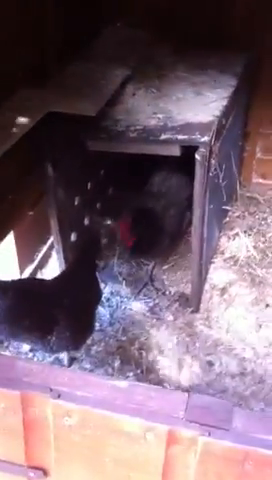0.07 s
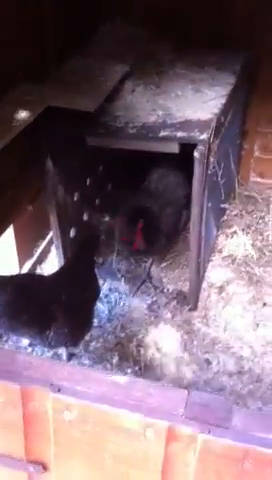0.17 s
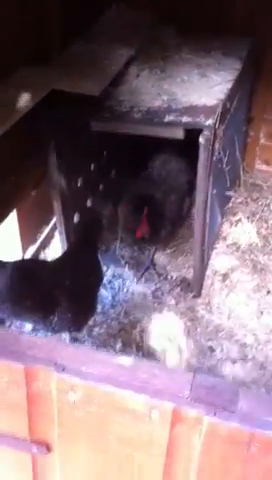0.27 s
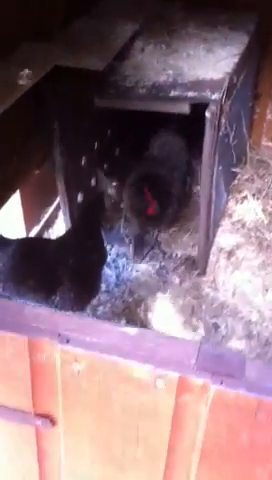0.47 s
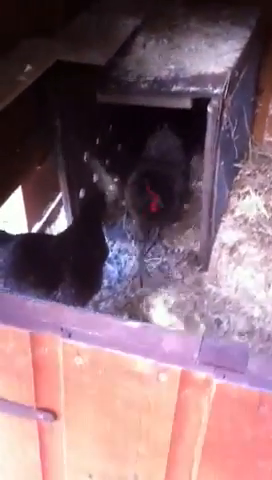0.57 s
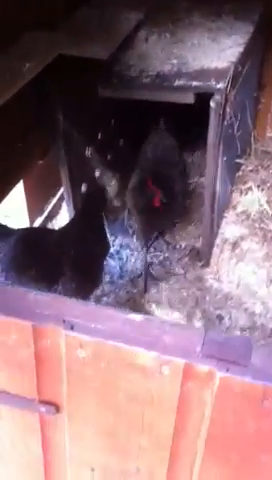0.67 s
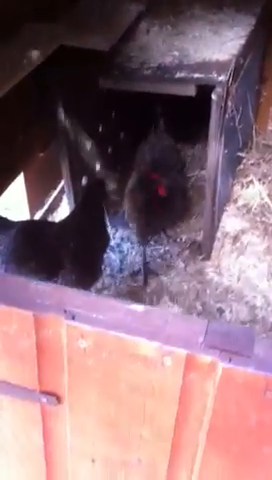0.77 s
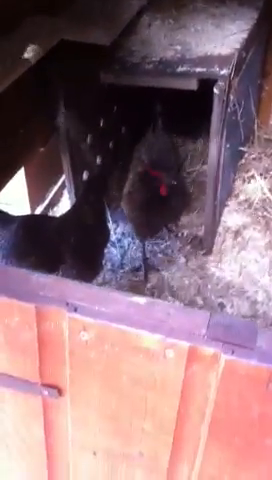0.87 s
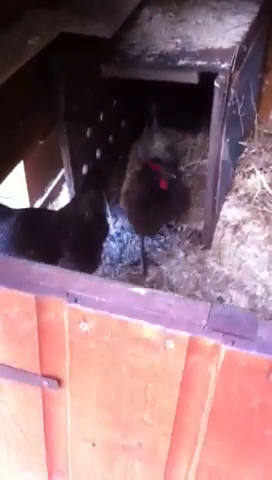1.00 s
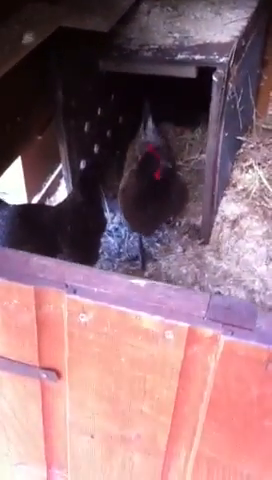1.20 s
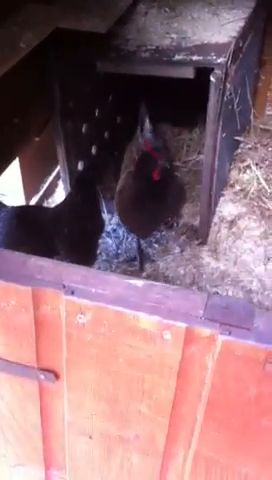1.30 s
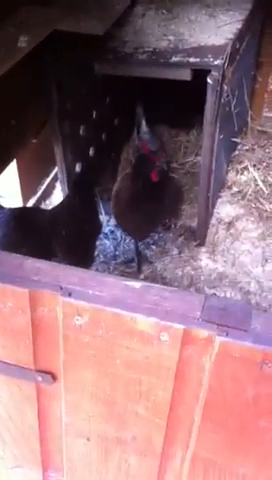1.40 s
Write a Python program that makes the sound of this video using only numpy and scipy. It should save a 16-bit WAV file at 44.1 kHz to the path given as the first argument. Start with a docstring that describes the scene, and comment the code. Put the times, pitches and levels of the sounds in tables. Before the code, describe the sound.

Hens clucking close to the microphone in a small wooden coop: a soft grunt, four short clucks growing hoarser, a loud broken squawk, then a higher cluck, with faint straw rustles over quiet outdoor air.

```python
"""A quiet outdoor background, then hens in a small wooden coop, close to the microphone: a low grunt,
four clucks at an even pace, the first fairly clean and the other three hoarse, one loud squawk that
breaks between clean and split tones, a higher cluck. Feet rustle in the straw. Pulses through throat
resonances make the clucks, drifting tones and hoarse air the squawk, a falling tone the grunt, and
filtered noise the straw and the air. Decaying noise echoes give the short ring of the boards."""
import sys
import numpy as np
from scipy import signal
from scipy.fft import rfft, irfft
from scipy.io import wavfile

SR = 44100
rng = np.random.default_rng(int(sys.argv[2]) if len(sys.argv) > 2 else 0)


def output_pcm(signal):
    """Save a mono or channel-first signal as 16-bit PCM at the path in sys.argv[1].

    Samples are clipped to [-1, 1] before scaling.
    """
    pcm = np.clip(np.atleast_2d(signal).T, -1, 1) * 32767
    wavfile.write(sys.argv[1], SR, np.round(pcm).astype(np.int16))


N = 63945
T = np.arange(N) / SR
ONSET_S = 0.0025  # ramp at the start of every cluck and at both ends of a level table


def amp(db):
    """Decibels to gain."""
    return 10 ** (np.asarray(db) / 20)


def unit(x):
    """Scale to rms 1 over the whole length."""
    return x / np.sqrt(np.mean(x ** 2))


def curve(table, axis):
    """One column of a table, joined by straight lines in time."""
    rows = np.array(table)
    return np.interp(T, rows[:, 0], rows[:, axis])


def loudness(table, axis):
    """Gain from a dB column, silent outside the table."""
    inside = np.minimum(T - table[0][0], table[-1][0] - T)
    return amp(curve(table, axis)) * np.clip(inside / ONSET_S, 0, 1)


def low_pass(x, order, hz):
    """Butterworth filter that keeps what lies below hz."""
    return signal.sosfilt(signal.butter(order, hz, fs=SR, output="sos"), x)


def high_pass(x, order, hz):
    """Butterworth filter that keeps what lies above hz."""
    return signal.sosfilt(signal.butter(order, hz, "high", fs=SR, output="sos"), x)


def wobble(hz):
    """Smooth chance with spread 1, about hz wide."""
    return unit(low_pass(rng.standard_normal(N), 3, hz))


def resonate(x, hz, width_hz):
    """One resonance, gain 1 at its centre."""
    return signal.lfilter(*signal.iirpeak(hz, hz / width_hz, fs=SR), x)


def formant(x, hz, width_hz):
    """A throat resonance with steep skirts, rms 1."""
    return unit(resonate(resonate(x, hz, width_hz), hz, width_hz))


def colour(x, points):
    """Causal minimum-phase filter through (Hz, dB) points, by folding the cepstrum."""
    hz, db = np.array(points).T
    size = 2048
    log_axis = np.log(np.fft.rfftfreq(size, 1 / SR) + 1)
    gain = amp(np.interp(log_axis, np.log(hz), db))
    cepstrum = irfft(np.log(gain))
    cepstrum[1:size // 2] *= 2
    cepstrum[size // 2 + 1:] = 0
    return signal.fftconvolve(x, irfft(np.exp(rfft(cepstrum))))[:N]


def cycles(hz, jitter, rate_hz):
    """Running cycle count of an unsteady membrane; jitter is the spread as a share of the pitch."""
    return np.cumsum(hz * (1 + jitter * wobble(rate_hz))) / SR


def tone(phase):
    """Sine of rms 1."""
    return np.sqrt(2) * np.sin(2 * np.pi * phase)


def pulses(phase):
    """One click per cycle, shared between two samples."""
    step = np.maximum(np.gradient(phase), 1 / SR)
    ramp = np.floor(phase) + np.clip(phase % 1 / step, 0, 1)
    return unit(np.diff(ramp, prepend=ramp[0]))


def puffs(phase):
    """Air that hisses hardest at the start of each cycle."""
    decay_cycles = 0.73
    return unit(rng.standard_normal(N) * np.exp(-(phase % 1) / decay_cycles))


def smear(x):
    """The nearest boards blur each pulse over a few milliseconds and ripple its spectrum."""
    decay_s, echo_db = 0.0054, 0.5
    echo = rng.standard_normal(N) * np.exp(-T / decay_s)
    return unit(x + amp(echo_db) * signal.fftconvolve(x, echo / np.linalg.norm(echo))[:N])


def open_beak(x, treble_db):
    """The gape of the beak raises or lowers the treble."""
    treble_hz = 4020
    low = signal.sosfiltfilt(signal.butter(2, treble_hz, fs=SR, output="sos"), x)
    return low + amp(treble_db) * (x - low)


def outdoor_air():
    """Steady noise, weighted to the lows, from outside the coop."""
    # spectrum of the background, relative: f/Hz, level/dB
    air_spectrum = [(25, -31), (110, -9.5), (170, -3), (270, -0.5), (400, -12), (800, -8), (1500, -16.5),
                    (4000, -23.5), (15500, -35)]
    air_db = -52.5
    return amp(air_db) * unit(colour(rng.standard_normal(N), air_spectrum))


def grunt():
    """A soft falling note from a closed beak: a tone and its octave, just before the first cluck."""
    # grunt: t/s, f/Hz, level of the fundamental/dB
    grunt_path = [(0.115, 184, -64), (0.145, 177.3, -45.5), (0.168, 161.3, -38.5), (0.200, 155, -63),
                  (0.235, 133, -54)]
    octave_db = -4  # against the fundamental
    phase = cycles(curve(grunt_path, axis=1), jitter=0.0084, rate_hz=43)
    return loudness(grunt_path, axis=2) * (tone(phase) + amp(octave_db) * tone(2 * phase))


def cluck(start, db, swell_db, hz, rough, low_hz, high_hz, high_db, treble_db, hold, fall_db_per_s):
    """Uneven pulses ring the throat and slow to a creak; the beak opens briefly and lets the rasp out."""
    # spectrum of the rasp, relative: f/Hz, level/dB
    rasp_spectrum = [(250, -9.5), (520, 5), (1300, 9.5), (1550, -8), (1780, 10), (1950, 2), (2150, 9.5),
                     (2450, 3.5), (2700, 1.5), (3800, 0), (4400, -12.5), (5900, -5.5), (6900, -11.5),
                     (8000, -11), (11300, -18), (15500, -21)]
    attack_s, creak_s, creak_drop = .027, .09, .6  # the drop is a share of the pitch
    beak_rise_db, beak_fall_db_per_s = 3, 363  # the treble opens later and shuts sooner
    jitter, breath, snap = .13 * rough, .5 * rough, 0.24  # snap: share of the clicks in the rasp
    low_width_hz, high_width_hz, beak_bend = 326, 297, .15
    chest_hz, chest_db = 283, -42.5

    age = T - start
    closed = np.clip(1 - age / attack_s, 0, 1)
    after = np.maximum(age - attack_s - hold, 0)
    swell = amp(-swell_db * closed ** 0.89 - fall_db_per_s * after)
    effort = np.clip(age / ONSET_S, 0, 1) * swell
    beak = amp(treble_db - beak_rise_db * closed - beak_fall_db_per_s * after)

    slack = min(rough, 1) * np.sin(np.pi * np.clip(after / creak_s, 0, 1))
    phase = cycles(hz * (1 - creak_drop * slack), jitter, rate_hz=220)
    voice, air = pulses(phase), puffs(phase)

    # the low resonance rises as the beak opens
    gape = np.sqrt(beak / amp(treble_db))
    source = voice + breath * air
    shut = formant(source, low_hz * (1 - beak_bend), low_width_hz)
    wide = formant(source, low_hz * (1 + beak_bend / 2), low_width_hz)
    body = (1 - gape) * shut + np.sqrt(gape) * wide

    chest = amp(chest_db) * unit(resonate(voice, chest_hz, width_hz=59))
    rasp = colour(smear(snap * voice + breath * air), rasp_spectrum)
    bright = unit(rasp) + amp(high_db) * formant(rasp, high_hz, high_width_hz)
    return effort * (chest + amp(db) * (body + beak * unit(bright)))


def clucks():
    """Four clucks, the first fairly clean and the other three hoarse, each with its own resonances."""
    # start t/s, level/dB, swell/dB, pitch before the creak f/Hz, roughness (0-1),
    # low resonance before the beak bends it f/Hz, high resonance f/Hz, its level against the rasp/dB,
    # treble/dB, hold/s, fall/(dB per s)
    cluck_rows = [(0.187, -25, 2, 271.6, .35, 893, 3340, -11, -10, 0.0055, 642),
                  (0.375, -23, 17.5, 287.3, 0.97, 900, 3070, -1.5, -4.5, 0.018, 455),
                  (0.614, -21.5, 18, 251, 1, 890, 2963, -3, -5, .021, 448),
                  (0.844, -19, 13.5, 268, 0.63, 981, 3005, -3.5, -3.5, 0.013, 433)]
    return sum(cluck(*row) for row in cluck_rows)


def straw():
    """Feet in the straw: each step is a short dry crackle of resonant noise that dies away."""
    # steps: t/s, level at the start/dB, centre f/Hz
    steps = [(0.527, -44, 1890), (0.725, -50.5, 5170), (0.762, -47.5, 2520), (1.323, -46.5, 2213)]
    decay_s = 0.0099
    out = np.zeros(N)
    for start, db, hz in steps:
        grain = rng.standard_normal(N) * amp(0.83 * wobble(hz=503))
        crackle = unit(resonate(grain, hz, width_hz=1140))
        out += amp(db) * crackle * (T > start) * np.exp(-np.abs(T - start) / decay_s)
    return out


def squawk():
    """A held tone whose voice splits: side tones beat with it, and hoarse air rides on every cycle."""
    # held voice, before shimmer: t/s, pitch f/Hz, fundamental level/dB, octave level/dB,
    # overtone level before the beak shapes the treble/dB
    held = [(0.940, 669.8, -22.5, -68, -76), (0.958, 658.7, -41, -28, -54),
            (0.972, 695.5, -18.5, -38, -27.5), (1.008, 684.4, -24.5, -20, -24),
            (1.066, 691.8, -22.5, -18.5, -30.5), (1.092, 654, -50, -28, -46),
            (1.116, 687.4, -23.5, -27, -28), (1.130, 680.5, -28, -17, -30.5),
            (1.175, 677.4, -28, -16.5, -29), (1.206, 680, -33, -23, -30), (1.218, 703.2, -21, -22.5, -49),
            (1.246, 696, -44, -26, -53), (1.275, 666, -52, -90, -63)]
    # two side tones of the split voice, before shimmer: t/s, lower f/Hz, lower level/dB,
    # upper f/Hz, upper level/dB
    split = [(0.940, 1000, -44, 1052, -56), (0.960, 995.4, -17, 1060, -12), (0.982, 1018, -15.5, 1084, -31),
             (1.005, 994, -22, 1169, -21), (1.045, 968, -29, 1156, -30), (1.080, 980, -19.5, 1150, -22),
             (1.105, 987, -29.5, 1161, -16.5), (1.130, 963, -38, 1176, -35),
             (1.198, 953.6, -41.5, 1183, -26), (1.218, 1026, -27, 1083, -21),
             (1.250, 955.6, -26.5, 1138, -29), (1.285, 957, -58, 1118, -41)]
    # hoarseness: t/s, air level before hoarse_db and the beak/dB, treble of air and overtones/dB
    hoarseness = [(0.930, -73, -15), (0.950, -23, -31), (0.960, -15, 4), (0.980, -14.5, -1),
                  (1.020, -21, 0), (1.105, -17, 0), (1.125, -26, 2), (1.200, -29.5, 2), (1.220, -15.5, -9),
                  (1.250, -24, -3), (1.275, -39.5, -41), (1.300, -44, -18)]
    # open throat, relative: f/Hz, level/dB
    throat = [(60, -50), (200, -58), (500, -18), (720, 3), (1100, -1.5), (1350, 5.5), (1520, -15),
              (1750, 3.5), (1920, -0.5), (2080, -0.5), (2380, 6), (2700, -5), (3100, -8.5), (3550, -6.5),
              (4200, -16), (5100, -10.5), (6300, -10), (7500, -16.5), (9200, -16.5), (10000, -21.5),
              (15500, -30)]
    held_jitter, split_jitter, shimmer_db = .005, .009, .8
    hoarse_db, sideband_db, upper_octave_db = -3, -14, -17
    middle_hz, middle_db = 1064, -2  # a third side tone that follows the lower one in level
    slip_cycles = 0.023  # pulses come a little early or late

    phase = cycles(curve(held, axis=1), held_jitter, rate_hz=130)
    fundamental = loudness(held, axis=2) * tone(phase)
    octave = loudness(held, axis=3) * tone(2 * phase)

    lower_gain = loudness(split, axis=2)
    lower = lower_gain * tone(cycles(curve(split, axis=1), split_jitter, rate_hz=600))
    middle = amp(middle_db) * lower_gain * tone(cycles(middle_hz, split_jitter, rate_hz=600))
    upper_phase = cycles(curve(split, axis=3), split_jitter, rate_hz=330)
    upper_pair = tone(upper_phase) + amp(upper_octave_db) * tone(2 * upper_phase)
    upper = loudness(split, axis=4) * upper_pair

    # multiplying the tones makes sums and differences of their pitches
    beating = lower * (0.67 * tone(phase) + 1.36 * tone(2 * phase) + 4 * tone(3 * phase))
    sidebands = amp(sideband_db) * colour(beating, throat)

    slipping = pulses(phase + slip_cycles * wobble(hz=333))
    overtones = loudness(held, axis=4) * unit(high_pass(colour(slipping, throat), 6, 1750))
    hoarse_air = unit(colour(smear(puffs(phase)), throat))
    hoarse = amp(hoarse_db) * loudness(hoarseness, axis=1) * hoarse_air
    bright = open_beak(overtones + hoarse, curve(hoarseness, axis=2))

    voice = fundamental + octave + lower + middle + upper + rings() + sidebands + bright
    return voice * amp(shimmer_db * wobble(hz=117))


def rings():
    """Three piercing, wavering high tones of the squawk that sag together as it ends."""
    # high tones: t/s, lowest tone f/Hz, then the level of each tone from low to high/dB
    ring_path = [(0.945, 2351, -46, -50, -62), (0.970, 2383, -21, -34, -61), (1.07, 2328, -30.5, -42, -42),
                 (1.135, 2339, -33.5, -57, -37), (1.2, 2309, -38, -31, -36.5), (1.238, 2247, -31, -45, -43),
                 (1.272, 2156, -43, -56, -70)]
    hz = curve(ring_path, axis=1)
    out = np.zeros(N)
    for axis, ratio in ((2, 1), (3, 1.5), (4, 2.11)):  # pitch against the lowest
        out += loudness(ring_path, axis) * tone(cycles(ratio * hz, jitter=.012, rate_hz=200))
    return out


def yelp():
    """A higher, squeaky cluck: strong and weak pulses alternate, with air between them."""
    # yelp: t/s, pitch f/Hz, level before the beak shapes the treble/dB, treble/dB
    yelp_path = [(1.362, 401.8, -72, -18), (1.380, 425, -35.5, -9), (1.388, 442.6, -44, 14),
                 (1.394, 456.8, -25, 0), (1.415, 469, -31, 6.5), (1.432, 433, -28, 1),
                 (1.460, 423, -35, -25)]
    # its throat, relative: f/Hz, level/dB
    yelp_throat = [(80, -36), (250, -10), (480, -8), (680, -6.5), (950, 0), (1350, 8.5), (1780, 5),
                   (2100, -9), (2700, -8.5), (4000, -11.5), (5400, -9.5), (5900, -20.5), (11000, -26.5),
                   (15500, -42)]
    jitter, breath, alternation = .04, .5, .5
    phase = cycles(curve(yelp_path, axis=1), jitter, rate_hz=182)
    voice = pulses(phase) * (1 + alternation * np.cos(np.pi * phase))
    sound = unit(colour(smear(voice + breath * puffs(phase)), yelp_throat))
    return loudness(yelp_path, axis=2) * open_beak(sound, curve(yelp_path, axis=3))


def coop(x):
    """Dense short echoes from the boards; the treble dies first."""
    low_t60_s, treble_t60_s, split_hz = 0.1, 0.028, 1030
    echo_db, delay_s = -3, 0.01  # the level is set before the noise is split into bands

    def fade(t60):
        """Decay of 60 dB in t60 seconds, silent until the delay has passed."""
        return np.exp(-np.log(1000) * T / t60) * (T > delay_s)

    noise = rng.standard_normal(N)
    low = low_pass(noise, 2, split_hz) * fade(low_t60_s)
    high = high_pass(noise, 2, split_hz) * fade(treble_t60_s)
    echo = (low + high) / np.linalg.norm(fade(low_t60_s))
    return x + amp(echo_db) * signal.fftconvolve(x, echo)[:N]


def scene():
    """Hens and straw inside the coop, over the outdoor air."""
    hens = grunt() + clucks() + squawk() + yelp()
    return (outdoor_air() + coop(hens + straw()))[None]


def record(dry):
    """The recorder cuts the top with a steep low-pass."""
    top_hz = 15850
    return signal.sosfilt(signal.ellip(10, .2, 80, top_hz, fs=SR, output="sos"), dry)


dry = scene()
out = record(dry)
output_pcm(out)
```